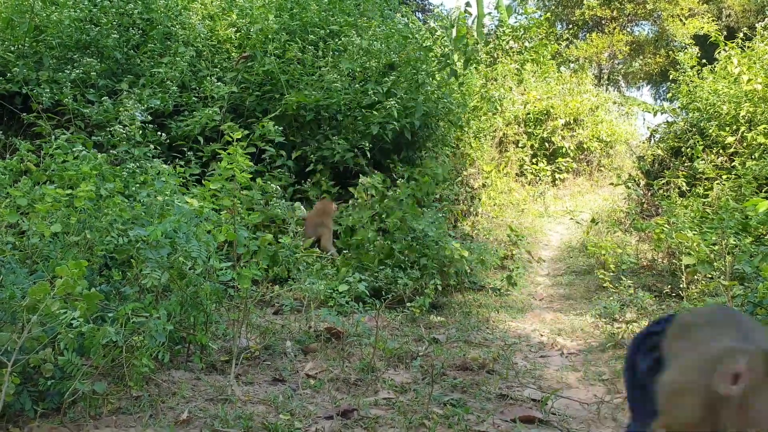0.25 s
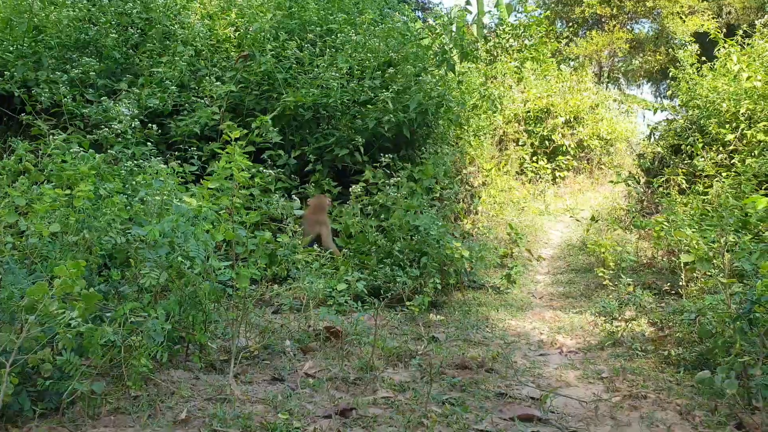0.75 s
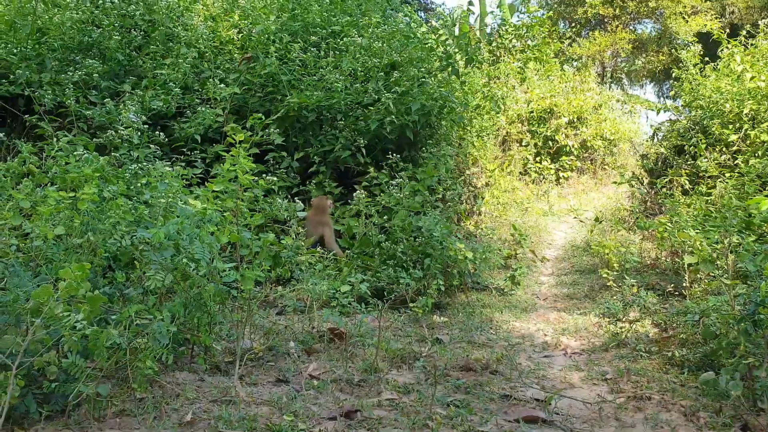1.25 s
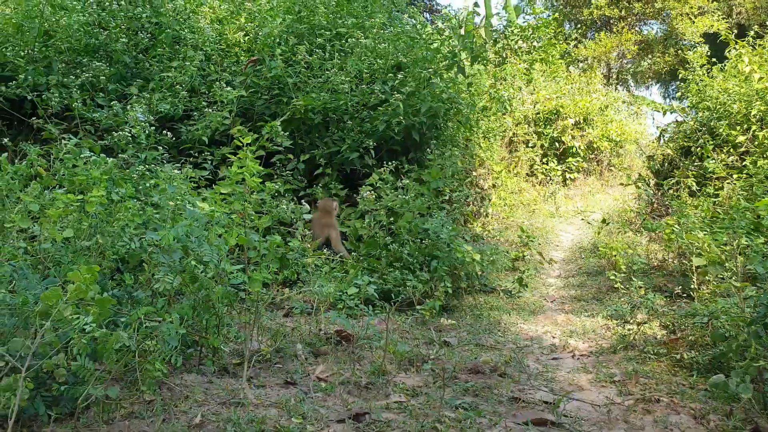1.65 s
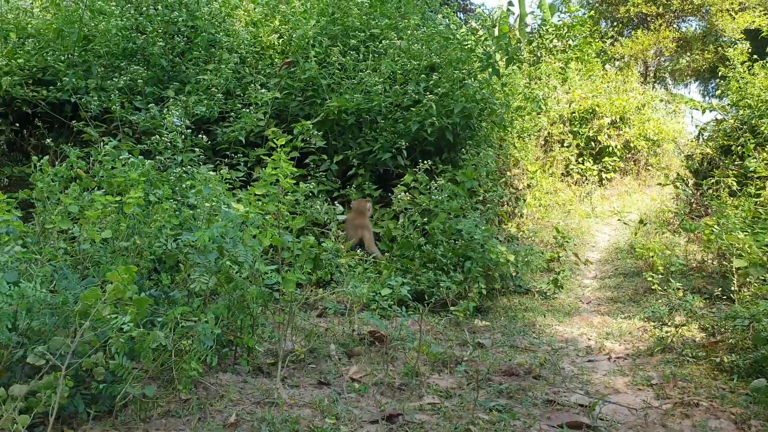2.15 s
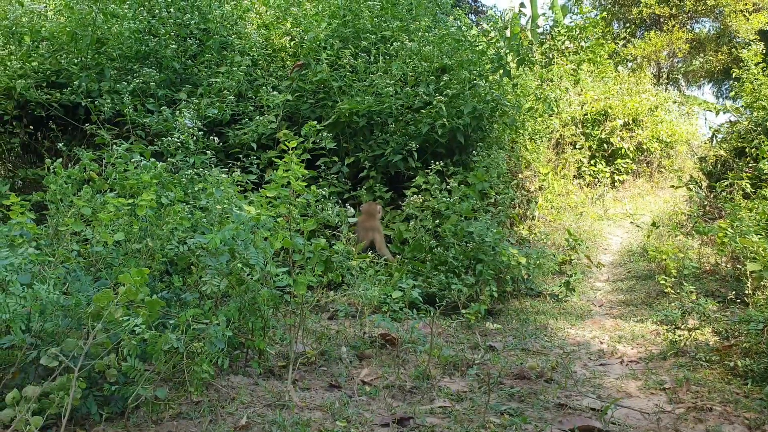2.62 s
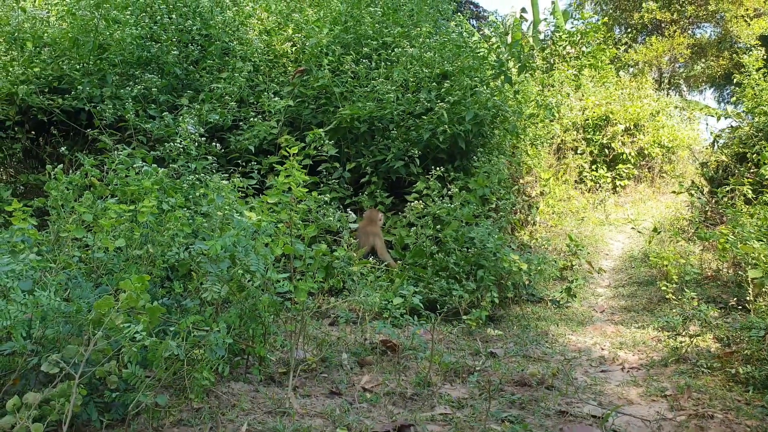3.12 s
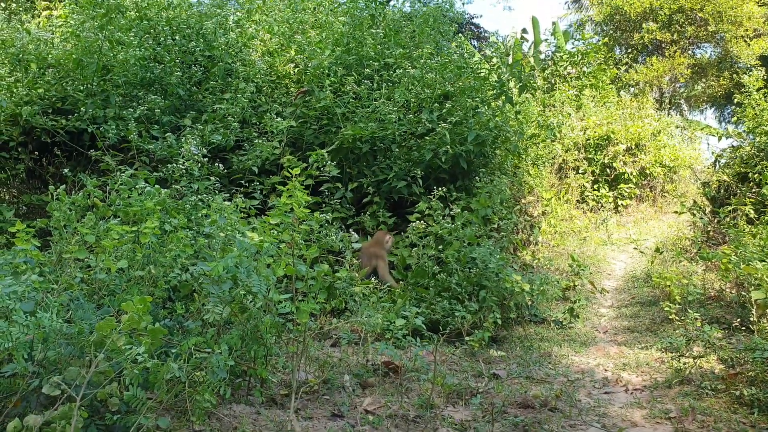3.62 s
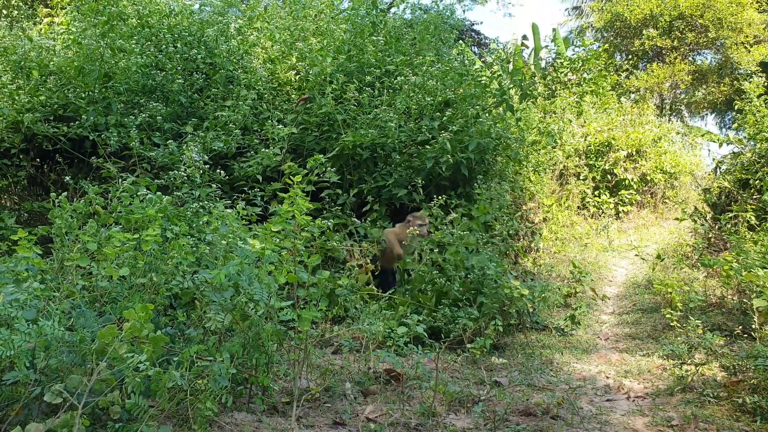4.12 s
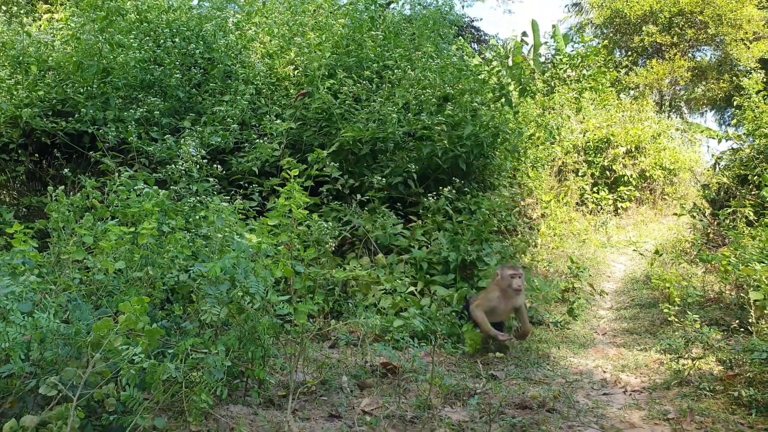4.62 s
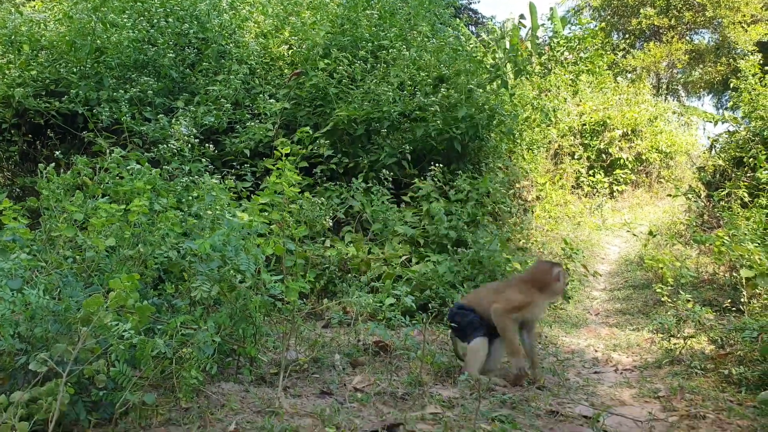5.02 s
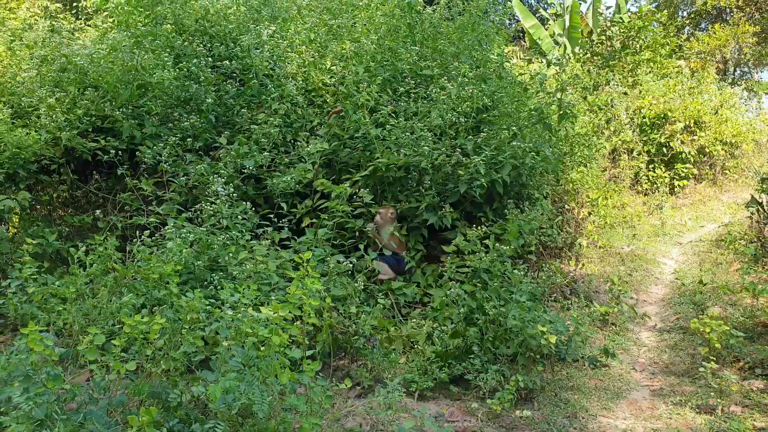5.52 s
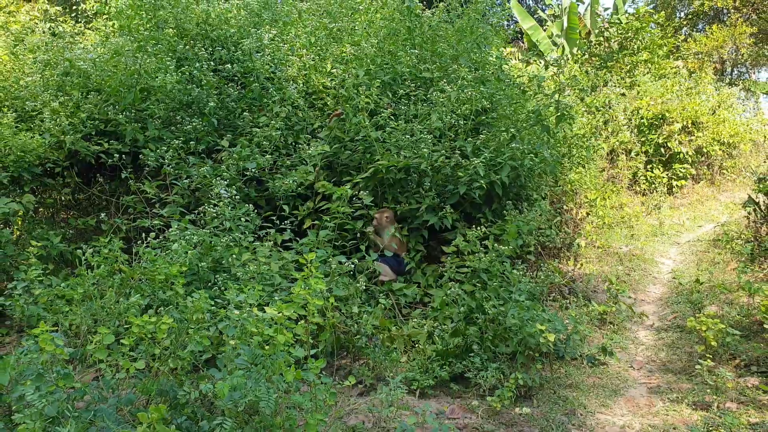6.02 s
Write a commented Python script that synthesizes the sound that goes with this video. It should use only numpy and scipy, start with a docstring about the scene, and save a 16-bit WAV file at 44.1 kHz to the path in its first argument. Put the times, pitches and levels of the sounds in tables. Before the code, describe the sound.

A stereo outdoor scene on a bushy path, with soft low wind rumble on the microphone and faint airy hiss. From 0 to 0.3 seconds a monkey gives a high, whining, unsteady coo that echoes in the thicket. At once dry litter rustles, and quick feet thud and crunch past, strongest around 0.4 to 0.6, fading by 1 with a few snaps. Throughout, a far bird gives short hollow pips about every 0.45 seconds. From 1.1 a small bird on the left adds irregular raspy high chips, with occasional thin rising whistles. Soft hand bumps come at 2.4, 2.7 and 3.9. From 4 to 5.1 a body bursts through leaves, swelling near 4.6 with cracking stalks and dull bumps. A faint, hoarse, echoing wail comes at about 5.5 to 5.9. Knocks, grip clicks and slight grass rustle close the scene from 5.85 to 6.25.

```python
"""Monkeys on a bushy path: one gives a high whining coo built of unsteady overtones, with a far wail later.
One scampers past the microphone and another bursts out of the leaves, in noise grains, snaps and thuds.
A far barbet pips evenly in gliding tones, a small bird chips raspily on the left, another whistles thinly.
The thicket scatters every call as dying noise echoes. Shaped noise makes the soft wind rumble and the hiss,
and the hand that holds the microphone knocks a few times in short low tones and dull clicks."""
import sys
import numpy as np
from scipy import signal
from scipy.fft import rfft, irfft
from scipy.io import wavfile
from scipy.ndimage import uniform_filter1d

SR = 44100
rng = np.random.default_rng(int(sys.argv[2]) if len(sys.argv) > 2 else 0)


def wrap_up_sound(samples):
    """Save the sound to the file named by the first command line argument, as 16-bit audio."""
    columns = np.atleast_2d(samples).T
    # keep every value between -1 and 1, then stretch to whole-number steps
    tamed = np.clip(columns, -1, 1)
    steps = np.round(tamed * 32767).astype(np.int16)
    wavfile.write(sys.argv[1], SR, steps)


N = 276507
TIME = np.arange(N) / SR  # s

# a monkey's footfalls on the litter: [t/s, strength/dB, left minus right/dB]
FOOTFALLS = [(.043, -50.5, 0), (0.251, -48.5, 4.5), (.415, -49.5, 3), (.444, -46, -0.5), (.48, -46.5, -3),
             (.57, -41, -1), (4.731, -58, -5)]


def undb(db):
    """Decibels to amplitude gain."""
    return 10 ** (np.asarray(db) / 20)


def pan(db):
    """Left and right gains for a level difference, left minus right in dB."""
    return undb(np.array([[db], [-db]]) / 2)


def add(out, start, sound):
    """Mix a stereo sound in at a time in s, cut at the ends of the scene."""
    i = int(start * SR)
    a, b = max(i, 0), min(i + sound.shape[-1], N)
    out[:, a:b] += sound[:, a - i:b - i]


def colour(x, points):
    """Shape a sound's spectrum by [f/Hz, gain/dB] points, joined along log frequency."""
    hz, db = np.transpose(points)
    f = np.maximum(np.fft.rfftfreq(N, 1 / SR), 1)
    gain = undb(np.interp(np.log(f), np.log(hz), db))
    return irfft(rfft(x) * gain, N)


def band(x, lo_hz, hi_hz, order=2):
    """Causal band-pass."""
    edges = [lo_hz, min(hi_hz, SR / 2 - 1000)]
    return signal.sosfilt(signal.butter(order, edges, "band", fs=SR, output="sos"), x)


def unit(x, lo_hz, hi_hz):
    """Scale a stereo sound so that its centre has rms 1 in a band."""
    return x / band(x.mean(0), lo_hz, hi_hz, order=4).std()


def walk(rate):
    """Random levels held 1 / rate s and slewed, with a spread of 1."""
    hold = max(int(SR / rate), 1)
    steps = np.repeat(rng.standard_normal(N // hold + 1), hold)
    smooth = uniform_filter1d(uniform_filter1d(steps, hold), hold)[:N]
    return smooth / smooth.std()


def thicket(x, t60, wet_db, delay=0.0029):
    """Diffuse echoes from leaves and trunks, different on each side: they swell in, then fall 60 dB in t60 s."""
    t = TIME[:SR]
    build_up = 1 - np.exp(-(t / delay) ** 2)
    echoes = rng.standard_normal((2, SR)) * undb(-60 * t / t60) * build_up
    echoes /= np.sqrt((echoes ** 2).sum(1, keepdims=True))
    centre = x.mean(0, keepdims=True)
    return undb(wet_db) * signal.fftconvolve(centre, echoes, axes=1)[:, :N]


def background():
    """Wind rumble on the microphone, nearly alike on both sides, under the still air's faint wide hiss."""
    # the wind's spectrum: [f/Hz, level/dB per Hz]
    wind_spectrum = [(20, -43), (35, -21.5), (50, -6.5), (63, 2), (76, -5.5), (97, -6), (115, -12.5),
                     (155, -19.5), (200, -28), (300, -33.5), (450, -53), (1000, -67)]
    # strength of the wind: [t/s, level/dB]
    gusts = [(0, -53), (1.2, -47.5), (2.2, -51.5), (4.2, -48.5), (5.5, -51.5), (5.95, -46.5), (6.27, -58.5)]
    # the hiss's spectrum: [f/Hz, level/dB per Hz]
    air_spectrum = [(150, 1), (400, -1), (700, -2.5), (1000, -4), (1500, -8.5), (2500, -10), (4000, -14.5),
                    (6000, -17), (8200, -27), (9800, -18), (11500, -12.5), (15500, -13.5)]
    air_db = -80.5

    buffets = rng.standard_normal(N) + undb(-11.0) * rng.standard_normal((2, N))
    buffets[1] = np.roll(buffets[1], int(0.00083 * SR))  # the gusts reach the right side a little later
    strength_db = np.interp(TIME, *np.transpose(gusts)) + 1.7 * walk(8)
    wind = unit(colour(buffets, wind_spectrum), 30, 300) * undb(strength_db) * pan(-3.5)
    air = unit(colour(rng.standard_normal((2, N)), air_spectrum), 900, 15000)
    return wind + air * undb(air_db + 0.059 * walk(2.7))


def note(shape, ratio=1, lead=0, rasp=0):
    """A bird's gliding note; rasp shakes its pitch, and the left side leads by a phase in radians."""
    s, hz, db = np.transpose(shape)
    t = TIME[:int(s[-1] * SR)]
    shake = np.interp(t, TIME[::50], rng.standard_normal(len(TIME[::50])))
    pitch_hz = ratio * np.interp(t, s, hz) * (1 + rasp * shake)
    phase = 2 * np.pi * np.cumsum(pitch_hz) / SR
    level = undb(np.interp(t, s, db)) * signal.windows.tukey(len(t), .15)
    return np.sqrt(2) * level * np.sin(phase + np.array([[lead], [0]]))


def barbet():
    """Short hollow pips from a far tree, off to the left; leaves scatter and blur their echo."""
    # one pip: [t/s from its start, f/Hz, level/dB]
    pip_shape = [(0, 728, -14), (.013, 733, -2.5), (.025, 730, 1), (.04, 727, 1.5), (.054, 740, -9.5),
                 (.061, 735, -10)]
    # it keeps time like a clock, each gap shorter than the last by hurry_s
    first_s, gap_s, hurry_s, count = -.035, .4496, .0005, 14
    pip_db, scatter_db = -59.5, .5  # ahead of the mix gains below

    out, echoes = np.zeros((2, 2, N))
    for k in range(count):
        s = first_s + k * gap_s - hurry_s * k ** 2 / 2
        gain = undb(pip_db + scatter_db * rng.standard_normal())
        add(out, s, gain * note(pip_shape, lead=2.0))
        add(echoes, s + rng.uniform(.005, .035), gain * note(pip_shape, rasp=.12))
    direct = undb(2.0) * out * pan(2.2)
    scattered = thicket(out, t60=0.38, wet_db=-9.5, delay=.012)
    blur = thicket(echoes, t60=.22, wet_db=0)
    return direct + scattered + undb(-9.5) * blur


def small_birds():
    """Raspy chips on the left, each a rise and fall with its own wobble, and a second bird's thin rising whistles."""
    # the chips: [t/s at the start, level/dB, pitch ratio]
    chip_calls = [(1.135, -64, .91), (1.16, -65, 0.86), (1.845, -60, 0.98), (2.011, -58.5, .98),
                  (2.315, -61.5, 0.99), (2.485, -60, .96), (2.967, -58, 0.99), (3.304, -59.5, 1),
                  (3.757, -60.5, 1.02), (3.96, -61, 0.98), (4.814, -57, 0.98), (5.334, -59.5, 1.02),
                  (5.881, -58.5, 0.99)]
    # one chip, a quick rise and a loud fall: [t/s from its start, f/Hz, level/dB]
    chip_shape = [(0, 6250, -14), (.008, 6740, -11.5), (.014, 7200, -14.5), (.023, 6670, -3.5),
                  (.035, 6050, -5), (0.044, 5510, -23.5)]
    # the whistles: [t/s at the start, level/dB]
    whistle_calls = [(1.195, -69.5), (1.745, -76), (3.61, -79), (4.889, -70), (5.53, -79)]
    # one whistle: [t/s from its start, f/Hz, level/dB]
    whistle_shape = [(0, 4650, -7), (.025, 5120, -6.5), (.05, 5550, -9.5), (.08, 6820, -6)]

    chips, whistles = np.zeros((2, 2, N))
    for s, db, ratio in chip_calls:
        wobble = rng.standard_normal((len(chip_shape), 3)) * [0, 110, 2]  # s, Hz, dB
        slur = np.array(chip_shape) + wobble
        add(chips, s, undb(db) * note(slur, ratio, rasp=.045))
    for s, db in whistle_calls:
        ratio = 1 + 0.015 * rng.standard_normal()
        add(whistles, s, undb(db) * note(whistle_shape, ratio, rasp=0.0069))
    left_bird = undb(-11.0) * chips * pan(17.3) + thicket(chips, t60=0.45, wet_db=-6.5) * pan(11.8)
    whistler = undb(-4) * whistles * pan(4.0) + thicket(whistles, t60=0.28, wet_db=-1)
    return left_bird + whistler


def thud(hz):
    """A soft blow: a low tone that dies in a few cycles."""
    t = TIME[:SR // 6]
    return np.sin(2 * np.pi * hz * t) * np.exp(-t * hz / 1.23) * (1 - np.exp(-t / 0.00091))


def tap(hz):
    """A short dull click with a faint bright edge and a scuff after it."""
    edge_db = -18  # relative to the dull body
    t = TIME[:SR // 6]
    scuff = undb(-26) * rng.standard_normal((2, len(t))) * undb(-60 * t / 0.098)
    contact = (t == 0) + scuff
    body = band(contact, hz * 0.5, hz * 1.406, order=3)
    return body / np.abs(body).max() + undb(edge_db) * contact


def knocks():
    """Feet thud and tap on the path; the hand bumps the microphone and its grip clicks."""
    # soft bumps of the hand on the microphone: [t/s, level/dB, f/Hz]
    hand_bumps = [(2.398, -39.5, 116), (2.676, -37, 118), (3.86, -40.5, 149), (4.421, -41, 74),
                  (4.612, -36.5, 85.4), (5.851, -33.5, 70.7), (6.02, -37.5, 300), (6.125, -44, 166)]
    # dull clicks of its grip: [t/s, level/dB, f/Hz, left minus right/dB]
    grip_clicks = [(3.862, -50, 1350, -18), (5.851, -42.5, 404, 2), (6.125, -39, 1170, 2),
                   (6.152, -46.5, 740, 3), (6.198, -53, 900, 7)]

    out = np.zeros((2, N))
    for s, db, side_db in FOOTFALLS:
        step = undb(0.5) * thud(169) + undb(-4) * tap(630)
        add(out, s, undb(db) * pan(side_db) * step)
    for s, db, hz in hand_bumps:
        add(out, s, undb(db) * pan(-7.5) * thud(hz))  # stronger on the right
    for s, db, hz, side_db in grip_clicks:
        add(out, s, undb(db) * pan(side_db) * tap(hz))
    return out + thicket(out, t60=.3, wet_db=-13)


def swishes():
    """Soft rubbing of twigs and soles: band-passed noise that swells and fades around one pitch."""
    # the swishes: [t/s at the middle, length/s, centre f/Hz, level/dB, left minus right/dB]
    rubs = [(0.561, .18, 2960, -66, -10), (0.831, .3, 2950, -75.5, -11), (1.041, 0.097, 2480, -77, -15),
            (4.429, .42, 3350, -65, -3), (6.104, .03, 1310, -61, 0), (6.118, 0.33, 1320, -73, 4.5)]
    fade_share = 0.41  # part of a swish spent swelling and fading

    out = np.zeros((2, N))
    for s, length, hz, db, side_db in rubs:
        swell = signal.windows.tukey(int(length * SR), fade_share)
        rub = band(rng.standard_normal((2, len(swell))), hz * 0.904, hz * 1.087)
        rub = rub * undb(2 * walk(85.6)[:len(swell)])
        add(out, s - length / 2, undb(db) * pan(side_db) * swell * rub / rub.std())
    return out


def leaves(spectrum, grain_rate, spread_db, grain_s):
    """Countless leaf contacts of very unequal size, each a tiny dying burst of noise with its own brightness."""
    ticks_per_s, tick_db = 19, 10  # some dry leaves crack, louder than the rest
    sizes_db = spread_db * np.minimum(rng.exponential(size=N), 4.5)
    contacts = (rng.random(N) < grain_rate / SR) * undb(sizes_db)
    contacts = contacts * undb(tick_db * (rng.random(N) < ticks_per_s / grain_rate))
    crackle = 0
    for lo, hi in [(150, 2400), (2400, 5000), (5000, 9000), (9000, 17000)]:
        # each contact varies apart in every band, which gives it its own brightness
        energy = (contacts * undb(4 * rng.standard_normal(N))) ** 2
        energy = signal.lfilter([1], [1, -np.exp(-1 / (grain_s * SR))], energy)
        crackle = crackle + band(np.sqrt(energy) * rng.standard_normal((2, N)), lo, hi)
    return unit(colour(crackle, spectrum), 8800, 15000) * undb(1.1 * walk(50))


def brushing(passages, attack_s):
    """Left and right strength of a rustle: it sets in, grows to a crest, fades, settles after the body has gone."""
    settle_db_per_s = 77  # the leaves come to rest, on top of the passage's own course
    drift_db_per_s = 5.5  # the monkeys move from left to right
    power = 0
    for start, crest, stop, db, growth, fading, side_db in passages:
        before, after, gone = np.maximum([crest - TIME, TIME - crest, TIME - stop], 0)
        swell_db = db - growth * before - fading * (after - gone) - settle_db_per_s * gone
        sides_db = (side_db - drift_db_per_s * (TIME - crest)) * np.array([[.5], [-.5]])
        onset = np.clip((TIME - start) / attack_s, 0, 1) ** 2
        power = power + (onset * undb(swell_db + sides_db)) ** 2
    return np.sqrt(power)


def rustles():
    """One monkey runs by over litter, one bursts from the bush, then thin grass stirs; stalks snap, feet crunch."""
    # bodies brushing through leaves: [t/s at the start, t/s at the crest, t/s at the stop,
    # crest level/dB, growth/dB per s, fading/dB per s, left minus right/dB at the crest]
    run_passages = [(-.05, .005, 0.044, -53, -2, 75, 3.5), (.2, .55, 0.98, -59.5, 15, 19.5, -0.5)]
    burst_passages = [(4.0, 4.58, 5.16, -56.5, 20.9, 54.4, 2), (4.95, 5.08, 5.064, -75.5, 13, 22, 2)]
    stir_passages = [(5.965, 5.99, 6.27, -68, 0, 40, -1)]
    # spectra of dry litter underfoot, green bush and thin grass: [f/Hz, level/dB per Hz]
    litter = [(200, 6), (500, -4), (900, -3.5), (1900, -10), (3000, -5.5), (4400, -7), (6600, -4.5),
              (8100, -10.5), (9700, 2.5), (12000, 0), (15500, -6)]
    bush = [(200, -4), (600, -5.5), (1400, -13), (2800, -11), (3300, -12), (4300, -8), (6600, -3),
            (8100, -12.5), (9400, -2), (10700, 1.5), (15500, -7.5)]
    grass = [(300, 7.5), (1500, 5), (2300, -1.5), (3000, -2.5), (4000, -14), (6200, -10), (8300, -11),
             (9900, 5.5), (14000, -4.5), (15500, -12)]
    # snapping stalks: [t/s, level/dB, left minus right/dB]
    stalks = [(.013, -44, -1), (.509, -45, -4), (.731, -49.5, -4), (.853, -51, -1), (3.862, -65, -1),
              (4.203, -55, 0), (4.448, -45, 1), (4.587, -44, -3), (4.638, -52, -3), (6.02, -59.5, 2.5)]
    crunch_db = 2  # relative to a footfall's strength

    run = brushing(run_passages, attack_s=0.044)
    run = run * leaves(litter, grain_rate=2400, spread_db=1.3, grain_s=0.002)
    burst = brushing(burst_passages, attack_s=0.078)
    burst = burst * leaves(bush, grain_rate=2800, spread_db=2.0, grain_s=0.0025)
    stir = brushing(stir_passages, attack_s=0.011)
    stir = stir * leaves(grass, grain_rate=2000, spread_db=2.0, grain_s=0.0017)

    snaps, t = np.zeros((2, N)), TIME[:SR // 10]
    # a quick crack with a longer, weaker tail
    decay = undb(-60 * t / 0.0088) + undb(-3.5) * undb(-60 * t / 0.11)
    decay = decay * (1 - np.exp(-t / 0.0018))
    crunches = [(s, db + crunch_db, side_db) for s, db, side_db in FOOTFALLS]
    for s, db, side_db in stalks + crunches:
        add(snaps, s, undb(db) * pan(side_db) * decay * rng.standard_normal((2, len(t))))
    return run + burst + stir + undb(5.5) * colour(snaps, litter)


def cry(curve, partials, jitter, rough):
    """Vocal folds with unsteady cycles; the throat favours one overtone, and reediness scales the others."""
    s, hz, db, reedy_db = np.transpose(curve)
    pitch_hz = np.interp(TIME, s, hz) * (1 + jitter * walk(260))
    phase = 2 * np.pi * np.cumsum(pitch_hz) / SR
    reedy = undb(np.interp(TIME, s, reedy_db))
    top = np.max(np.array(partials)[:, 1])
    voice = 0
    for k, (_, gain) in enumerate(partials):
        lift = 1 if gain == top else reedy
        voice = voice + undb(gain) * lift * np.sin((k + 1) * phase)
    effort = undb(np.interp(TIME, s, db)) * (1 + rough * walk(420))
    gate = np.clip(np.minimum(TIME - s[0], s[-1] - TIME) / .002, 0, 1)
    return np.sqrt(2) * voice * effort * gate


def monkeys():
    """A near coo and, later, a hoarse far wail that is mostly echo, both from unsteady vocal folds."""
    # courses of the near coo and the far wail: [t/s, f/Hz of the pitch, level/dB, reediness/dB]
    coo_curve = [(0, 418, -34.5, -3.5), (.025, 438, -52, -6), (.07, 433, -47, 1), (.16, 423.2, -51, -3),
                 (.197, 434, -51.5, 5.5), (.232, 411.8, -44.5, -7.5), (.262, 427.4, -52, 0),
                 (.31, 420, -80, -1)]
    wail_curve = [(5.5, 554, -80, 19), (5.56, 571.6, -62.5, -0.5), (5.62, 563.4, -75.5, -12),
                  (5.68, 585.5, -73, 6), (5.74, 576.5, -66.5, 6), (5.84, 575, -75.5, 2),
                  (5.95, 565, -100, -3)]
    # their overtones: [multiple of the pitch, level/dB]
    coo_partials = [(1, -25.5), (2, -15.5), (3, -15), (4, 1), (5, -21), (6, -43), (7, -43)]
    wail_partials = [(1, -30), (2, -1.5), (3, -22)]

    coo = cry(coo_curve, coo_partials, jitter=.011, rough=.25) * pan(.5)
    wail = cry(wail_curve, wail_partials, jitter=.02, rough=.35) * pan(-1.2)
    near = undb(-3.0) * coo + thicket(coo, t60=0.75, wet_db=-6.5)
    far = undb(-8) * wail + thicket(wail, t60=0.96, wet_db=1)
    return near + far


def scene():
    """Everything along the path, from the wind to the monkeys."""
    surroundings = background() + barbet() + small_birds()
    return surroundings + knocks() + swishes() + rustles() + monkeys()


def record(dry):
    """The recorder cuts the top with a steep low-pass."""
    top_hz = 15750
    return signal.sosfilt(signal.ellip(10, .2, 70, top_hz, fs=SR, output="sos"), dry)


dry = scene()
out = record(dry)
wrap_up_sound(out)
```